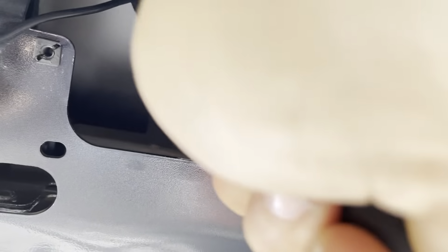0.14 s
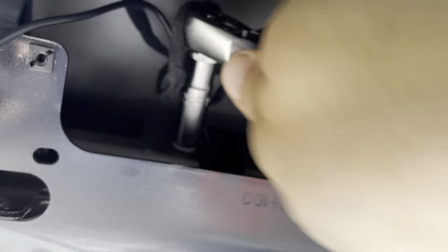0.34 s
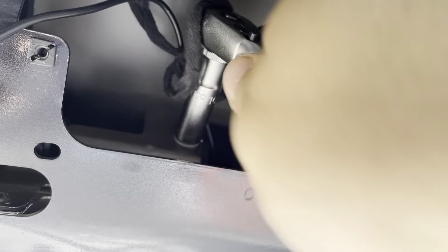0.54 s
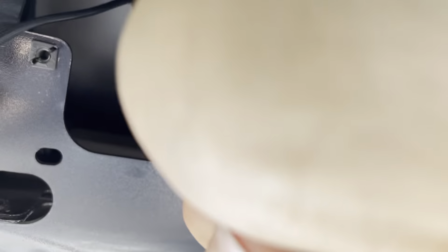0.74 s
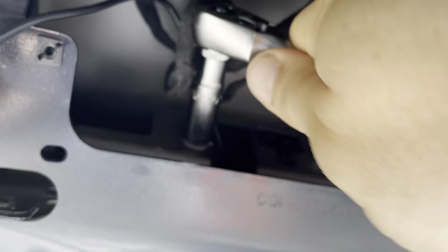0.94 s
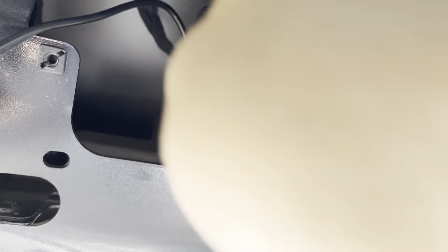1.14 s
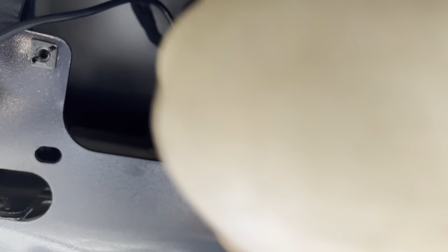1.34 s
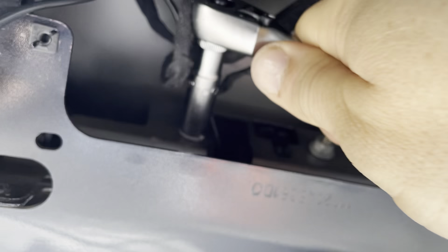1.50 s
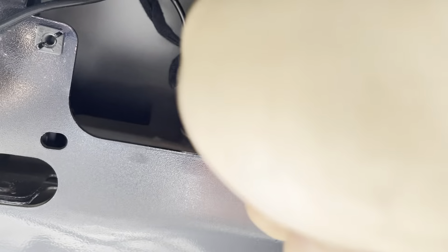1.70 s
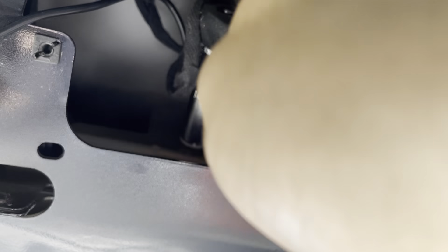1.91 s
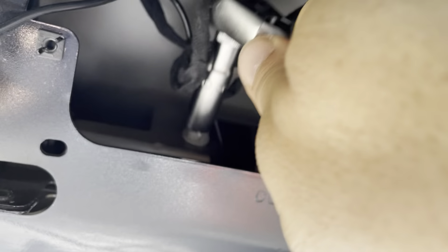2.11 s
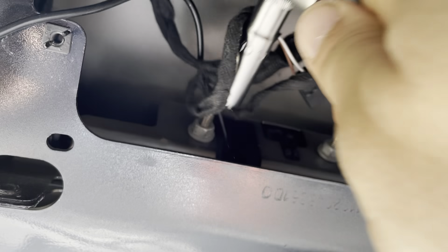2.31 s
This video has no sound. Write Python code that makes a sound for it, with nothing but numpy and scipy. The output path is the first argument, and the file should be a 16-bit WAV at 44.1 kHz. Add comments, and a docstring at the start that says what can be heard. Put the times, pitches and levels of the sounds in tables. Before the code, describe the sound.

A ratchet wrench clicks in short quick runs, with dull hollow knocks from car bodywork between.

```python
"""In a garage, a ratchet wrench works on a nut in a car's bodywork, close to a phone microphone pair.
On each back swing the pawl clicks over the teeth: noise bursts, and decaying modes of the steel shaft.
When the play is taken up the tool knocks, and the hollow panel's modes and filtered noise boom with it.
Random contacts rattle in the loose joints; at the end the socket scrapes and clanks off the nut.
Shaped noise gives the rumble of the handled car, faint air, brief hisses and a thin hum."""
import sys
import numpy as np
from scipy import signal
from scipy.fft import rfft, irfft, next_fast_len
from scipy.io import wavfile
from scipy.ndimage import map_coordinates

SR = 44100
rng = np.random.default_rng(int(sys.argv[2]) if len(sys.argv) > 2 else 0)


def put_to_file(sound):
    """Save the sound as 16-bit audio at rate SR, in the file named by the first command-line argument."""
    columns = np.atleast_2d(sound).T  # one column per channel
    safe = np.clip(columns, -1, 1)
    whole_steps = np.round(safe * 32767)
    wavfile.write(sys.argv[1], SR, whole_steps.astype(np.int16))


def boost(x):
    """Linear amplitude factor 10**(x/20) for a level x in decibels (scalar or array-like)."""
    u = np.asarray(x, float) / 20
    return 10 ** u


N = 103635  # samples

# modes of the steel shaft: f/Hz, relative level/dB, t60/s before any change of damping
SHAFT = [(1793, -8, 0.017), (2074, 0.5, 0.057), (2336, -1, 0.05), (2443, -4.5, 0.068), (2511, -2.5, 0.058),
         (2720, -7, 0.045), (2893, -3, 0.051), (3140, -2.5, 0.063), (3254, -2, 0.039), (3577, -11.5, 0.037),
         (4530, -14, 0.032), (5190, -19.5, 0.037)]
# spectrum of the brightest steel noise: f/Hz, relative density/dB per Hz
TREBLE = [(4710, -56), (8000, -28), (8610, -39), (8740, 5), (9920, 2.5), (11600, -3), (12600, -2.5),
          (14400, -1), (16100, -27), (16700, -64)]
# spectrum of the steel noise below it: f/Hz, relative density/dB per Hz
MIDDLE = [(2240, -8.5), (3800, -5.5), (4240, -1), (4760, -9), (5280, -3), (5810, -14.5), (7160, -2),
          (8200, -0.5), (10700, -43), (18000, -120)]
# spectrum of broad sheet-metal clatter: f/Hz, relative density/dB per Hz
CLATTER = [(400, -49), (600, -27), (800, 6.5), (1200, 11.5), (1700, 12.5), (2500, -38), (4000, -28),
           (5000, -60)]
CONTACT_SPREAD_DB = 4  # uneven strength of small steel contacts


def unit(x):
    """Normalisation to an rms of 1."""
    return x / np.sqrt(np.mean(x ** 2) + 1e-20)


def along(points, hz):
    """Linear interpolation of (f/Hz, value) points on a logarithmic frequency axis."""
    f, v = np.transpose(points)
    return np.interp(np.log(hz + 1), np.log(f + 1), v)


def level(rows):
    """Amplitude modulation: gain per sample, interpolated in dB from (t/s, level/dB) rows."""
    s, db = np.transpose(rows)
    return boost(np.interp(np.arange(N) / SR, s, db))


def wobble(rate):
    """Slow random modulation: a smooth curve through rate random knots a second."""
    knots = rng.standard_normal(int(N * rate / SR) + 4)
    return map_coordinates(knots, [np.arange(N) * rate / SR])


def filtered(x, response):
    """Linear filtering: the spectrum times a complex response of frequency."""
    m = next_fast_len(N + SR // 2)
    return irfft(rfft(x, m) * response(np.fft.rfftfreq(m, 1 / SR)), m)[..., :N]


def coloured(x, spectrum):
    """Spectral shaping of x by (f/Hz, level/dB) points, to an rms of 1."""
    return unit(filtered(x, lambda hz: boost(along(spectrum, hz))))


def noise(spectrum):
    """Subtractive synthesis: white noise given a spectrum, with an rms of 1."""
    return coloured(rng.standard_normal(N), spectrum)


def band(hz, width):
    """Band-pass noise around a frequency, with sloping sides."""
    return noise([(max(hz - width, 20), -45), (hz, 0), (hz + width, -45)])


def envelope(events, t60, rise):
    """Superposed impulse responses: quick rise and exponential fall after each (t/s, level/dB)."""
    t = np.arange(SR // 4) / SR
    starts = [round(s * SR) for s, _ in events]
    spikes = np.bincount(starts, boost([db for _, db in events]), N)[:N]
    return signal.fftconvolve(spikes, boost(-60 * t / t60) * (1 - np.exp(-t / rise)))[:N]


def swells(rows):
    """Growth and decay: a bell-shaped rise to each peak, an exponential fall after it."""
    t = np.arange(N) / SR
    total = 0
    for s, db, swell, t60 in rows:
        loss_db = np.where(t < s, 9 * ((s - t) / swell) ** 2, 60 * (t - s) / t60)
        total = total + boost(db - loss_db)
    return total


def ring(modes, split_hz, tilt_db, rise, free, scatter_db, spread, upper_db=0):
    """Modal synthesis of one blow, peak 1: free scales each decay time, tilt_db favours modes below split_hz."""
    hz, db, t60 = np.transpose(modes)[:, :, None]
    t = np.arange(SR // 4) / SR
    level_chance, phase_chance, pitch_chance = rng.standard_normal((3, len(modes), 1))
    tilt = np.where(hz < split_hz, tilt_db, -tilt_db) / 2
    start_db = db + scatter_db * level_chance + tilt + upper_db * (hz > 600)
    gain = boost(start_db - 60 * t / (t60 * free))
    phase = 2 * np.pi * hz * (1 + spread * pitch_chance) * t + spread * 60 * phase_chance
    wave = np.sum(gain * np.sin(phase), axis=0)
    wave = wave * (1 - np.exp(-(t / rise) ** 2))
    return wave / np.abs(wave).max()


def add(out, s, sound):
    """Superposition: mixes a sound in at time s."""
    out[round(s * SR):][:len(sound)] += sound


def body(f):
    """Resonance: the shaft's modes as a bank of band-pass filters of alternating sign."""
    blur = 7.9  # chatter widens each mode: width/Hz times t60/s
    total = 0
    for k, (centre, db, t60) in enumerate(SHAFT):
        damping = 1j * f * blur / t60
        total = total + (-1) ** k * boost(db) * damping / (centre * centre - f * f + damping)
    return total


def rumble():
    """Low-frequency structure-borne noise of the handled car, partly common to both ports."""
    # t/s, relative level of the deep band/dB, relative level of the upper bass/dB
    strengths = np.array([(0.0, -57, -31.5), (0.06, -60, -39.5), (0.77, -54.5, -35), (0.939, -28.5, -40),
                          (0.96, -45, -67), (1.02, -31.5, -34.5), (1.12, -37.5, -34.5), (1.25, -25, -32.5),
                          (1.33, -37, -57), (1.43, -25.5, -38), (1.5, -22, -34), (1.56, -35.5, -36),
                          (1.74, -40, -46.5), (1.82, -45.5, -45), (1.96, -37.5, -36), (1.991, -49, -63),
                          (2.281, -46, -59), (2.35, -57, -64)])
    # spectrum of the deep band: f/Hz, relative density/dB per Hz
    deep = [(21, -46), (38, -5), (65, -3), (90, -6.5), (120, -28), (200, -120)]
    # spectrum of the upper bass: f/Hz, relative density/dB per Hz
    upper_bass = [(45, -35), (70, 5), (100, 13), (140, 15.5), (200, 8.5), (260, -44)]

    def draw():
        bass = level(strengths[:, ::2]) * boost(-5) * noise(upper_bass)
        return level(strengths[:, :2]) * noise(deep) + bass

    shared = draw()
    return np.array([shared + boost(-6) * draw() for _ in range(2)])


def air():
    """Partly coherent background noise: a shared part that fluctuates and a steadier one for each port."""
    # spectrum of the air noise: f/Hz, relative density/dB per Hz
    spectrum = [(200, -24), (300, 2), (500, -28.5), (900, -51), (1500, -16), (2200, -18), (3400, -14.5),
                (4800, -17), (7400, -22.5), (8000, -25.5), (9700, -30.5), (10500, -22), (15500, -22),
                (16200, -52)]
    # course of the air noise: t/s, relative level/dB
    course = level([(0, -65), (.75, -64.5), (.9, -71), (1.6, -63.5), (2, -68.5), (2.2, -62)])
    shared = course * boost(3.3 * wobble(5.63)) * noise(spectrum)
    return np.array([shared + course * boost(-5) * noise(spectrum) for _ in range(2)])


def loaded_panel():
    """Forced vibration: hand and tool load the panel and keep it booming unevenly."""
    # course of the load: t/s, level/dB before the unevenness
    load = [(0, -52.5), (.185, -57), (.2, -27.5), (.33, -28), (.39, -38.5), (.41, -32.5), (.46, -28),
            (.55, -39.5), (.58, -41.5), (.7, -54.5), (.725, -40.5), (.76, -26.5), (.9, -35.5), (.945, -65),
            (.98, -34), (1.03, -29.5), (1.08, -48), (1.12, -54), (1.22, -55.5), (1.25, -43), (1.31, -24),
            (1.43, -36.5), (1.46, -36.5), (1.48, -21.5), (1.6, -38.5), (1.66, -55), (1.8, -51),
            (1.84, -28.5), (1.88, -35), (1.98, -55.5), (2, -33.5), (2.09, -29), (2.19, -59.5),
            (2.32, -58.5), (2.35, -25.5)]
    # spectrum of the boom: f/Hz, relative density/dB per Hz
    spectrum = [(88, -64), (150, -5), (242, 3), (299, -9), (383, 0), (616, -25), (662, -22), (746, -18),
                (888, -25.5), (1000, -26.5), (1300, -56), (2200, -120)]
    uneven = boost(2.5 * wobble(40.22))
    return level(load) * uneven * noise(spectrum)


def rattles():
    """Random excitation of resonators: small contacts in loose joints ring the shaft, sheet metal and bright ticks."""
    # clusters of contacts: t/s of the peak, relative level/dB, swell/s, t60/s, bright ticks over that level/dB
    clusters = [(0.198, -44, 0.0013, .05, -20), (0.211, -34, 0.0029, 0.085, -23),
                (0.418, -47.5, 0.0047, 0.12, -14), (0.436, -34.5, 0.0078, 0.072, -13.5),
                (0.535, -50, 0.0098, 0.062, -5.5), (0.734, -27, 0.0027, 0.068, -18),
                (0.986, -46, 0.0062, 0.1, -8), (1.005, -39, 0.0096, 0.045, -21),
                (1.255, -46, 0.0064, 0.036, -32), (1.289, -34.5, 0.011, 0.063, -15),
                (1.469, -39, 0.0048, 0.19, -30), (1.495, -38, 0.002, 0.083, -5),
                (1.514, -29, 0.0018, 0.031, -14.5), (1.585, -47.5, 0.0064, 0.11, -28),
                (1.812, -45.5, 0.0064, 0.1, -35), (1.824, -33, 0.005, 0.085, -12.5),
                (1.851, -41, 0.0029, 0.047, -10), (1.923, -56, 0.0045, 0.034, 1),
                (2.006, -47, 0.0033, 0.069, -24), (2.049, -25, 0.013, 0.099, -29),
                (2.084, -30.5, 0.0036, 0.066, -16), (2.113, -53, 0.0044, 0.054, 10.5),
                (2.325, -51, 0.016, .08, -11)]
    contacts_per_s, soft_hz = 1300, 5000

    def grit():
        hits = rng.random(N) < contacts_per_s / SR
        return unit(hits * rng.standard_normal(N) * boost(CONTACT_SPREAD_DB * wobble(150)))

    def soft(hz):  # soft contacts excite the shaft less in the treble
        return body(hz) / (1 + 1j * hz / soft_hz) ** 2

    low = swells([row[:4] for row in clusters])
    high = swells([(s, db + bright_db, swell, t60) for s, db, swell, t60, bright_db in clusters])
    contacts = grit()
    rung = filtered(low * contacts, soft) / np.std(filtered(contacts, soft))
    sheet = boost(-0.5) * low * coloured(grit(), CLATTER)
    ticks = high * (coloured(grit(), MIDDLE) + boost(-5) * coloured(grit(), TREBLE))
    return rung + sheet + ticks


def knocks():
    """Free vibration: soft knocks ring the modes of the hollow steel panel, with a noisy crunch."""
    # t/s, peak level of the ring/dB, low over high modes/dB, change of modes above 600 Hz/dB,
    # rise/s, factor on the modes' t60
    blows = [(0.209, -13, -0.5, 0.5, 0.0061, 0.62), (0.234, -22.5, -23, -1, 0.0027, 1.4),
             (0.26, -20, 3, -14, 0.0014, 1.3), (0.278, -22.5, -5, -5, 0.0022, 0.78),
             (0.302, -16.5, -15, -4.5, 0.0042, 2.5), (0.419, -25, 13, 0, 0.0069, 0.78),
             (0.434, -14, 5, 0.5, 0.0048, 1.03), (0.45, -27, 15, 5, 0.0016, 1.6),
             (0.518, -19.5, 14.5, -9, 0.0035, 2), (0.537, -29, 28, 2, 0.007, 0.32),
             (0.735, -2.5, -3.5, 1.5, 0.0034, 0.98), (0.766, -17, -1, -4, 0.0027, 0.82),
             (0.814, -23.5, -9, -1, 0.002, 0.52), (0.982, -19.5, 19, 2, 0.0038, 1.8),
             (1.007, -13, -2.5, -6.5, 0.0043, 1.6), (1.055, -20, 8, -1, 0.0087, 0.62),
             (1.254, -18, -1, -8.5, 0.0056, 0.47), (1.281, -3, -0.5, -7, 0.0044, 1.11),
             (1.474, -17, 2, -1, 0.0054, 0.76), (1.494, -7.5, 15, -3, 0.0046, 1.1),
             (1.516, -21, -8, 17, 0.0034, 1.1), (1.539, -8, 8, -15, 0.0028, 0.76),
             (1.587, -11.5, 8.5, -15, 0.0043, 0.64), (1.81, -18, 28, 0, 0.0037, 1.4),
             (1.82, -4, -8.5, 0.5, 0.0025, 0.9), (1.853, -15, 3.5, -1.5, 0.0012, 0.98),
             (1.921, -28, 3, -6, 0.004, 1), (1.993, -20.5, 5.5, -1.5, 0.0012, 0.85),
             (2.071, -19, -3.5, 3, 0.00087, 0.43), (2.333, -32, -13, -1, 0.0065, 0.81)]
    # modes of the panel: f/Hz, relative level/dB, t60/s before that factor
    modes = [(141.7, -10, 0.16), (206.7, -7.5, 0.07), (234.7, -2, 0.1), (379.1, -0.5, 0.079),
             (400.8, -1.5, 0.058), (512.6, -17, 0.083), (723, -13.5, 0.052), (758, -8.5, 0.045),
             (1009, -17, 0.051), (1102, -23.5, 0.053)]
    out = np.zeros(N + SR)
    for s, db, tilt_db, upper_db, rise, free in blows:
        blow = ring(modes, 300, tilt_db, rise, free, scatter_db=1.5, spread=0.006, upper_db=upper_db)
        add(out, s, boost(db) * blow)
    crunches = [(s, db - 27 - tilt_db / 2) for s, db, tilt_db, *_ in blows]
    return out[:N] + envelope(crunches, t60=0.1, rise=0.00066) * noise(CLATTER)


def wrench():
    """Impact excitation: pawl snaps are noise bursts; each contact rings the shaft, with spring and tooth chatter."""
    # pawl clicks and small steel ticks: t/s, reference level/dB,
    # middle burst relative to it/dB and shaft ring relative to it/dB, each before an offset
    clicks = [(0.2554, -8.5, 2.5, -4.5), (0.27, -8.5, 7, -6), (0.285, -7, 3, -6.5), (0.3013, -6.5, 1, -8.5),
              (0.3214, -18.5, 7, -4), (0.3568, -20, 10.5, 4.5), (0.4085, -42, 7, -24),
              (0.4329, -33.5, 0, -5), (0.4508, -41, -1, -25), (0.795, -18, 11, -2), (0.8123, -15, -1, 7.5),
              (0.832, -19.5, 15.5, 7.5), (0.8576, -14, -5, 2), (0.8882, -21, 5.5, 8), (0.9867, -44, 6, 2),
              (1, -43, 12, 9), (1.0373, -37, 17, 4.5), (1.3333, -14.5, 10, -8.5), (1.346, -19, 9.5, 2),
              (1.361, -20, 8, 4), (1.3786, -17, -8, 5), (1.4031, -19, 12, 1), (1.4335, -18.5, 5, 1.5),
              (1.739, -38.5, 12.5, -20), (1.906, -43, -7, -5), (1.954, -36, -7, -16),
              (1.9885, -24, 10.5, -3), (2.0665, -20, 0, -8)]
    # steel on steel without the pawl: t/s, reference level/dB, middle burst over it/dB, low over high modes/dB
    clanks = [(0.5494, -49.5, -9, -15), (0.7353, -25, -11, 2), (1.4666, -40, -26, 5),
              (1.5848, -42, -15, -1), (1.8194, -15.5, -24, -2), (2.0669, -4, -11.5, -10.5),
              (2.0703, -11.5, -11, 0.5), (2.0815, -17, -10, -7), (2.3303, -29, -19, -29),
              (2.3378, -41, -13, 11)]
    snap_rise, shaft_rise = 0.00021, 0.00026  # s
    top = envelope([(s, db - 8.5) for s, db, _, _ in clicks], 0.028, snap_rise) * noise(TREBLE)
    bursts = [(s, db + rel - 17) for s, db, rel, _ in clicks]
    bursts += [(s, db + rel) for s, db, rel, _ in clanks]
    middle = envelope(bursts, 0.029, snap_rise) * noise(MIDDLE)

    # t/s, level/dB, clear ring relative to it/dB, low over high modes/dB
    blows = [(s, db + rel - 5.5, -4, 0) for s, db, _, rel in clicks]
    blows += [(s, db - 6, 0, tilt_db) for s, db, _, tilt_db in clanks]
    shaft = np.zeros(N + SR)
    for s, db, clear_db, tilt_db in blows:
        blow = ring(SHAFT, 3050, tilt_db, shaft_rise, free=0.68, scatter_db=4.5, spread=0.013)
        add(shaft, s, boost(db + clear_db) * blow)

    shake = envelope([blow[:2] for blow in blows], 0.042, shaft_rise)
    rough = rng.standard_normal(N) * boost(CONTACT_SPREAD_DB * wobble(300))
    chatter = filtered(shake * rough, body) / np.std(filtered(rough, body)) / 2
    sheet = boost(-19) * shake * noise(CLATTER)
    steel = middle + shaft[:N] + chatter + sheet
    # a near wall returns the steel once, 12.4 ms later
    echo = boost(-13.5) * np.pad(steel, (round(0.0124 * SR), 0))[:N]
    return top + steel + echo


def hisses():
    """Band-limited noise: faint hisses that rise and fall under a rounded window."""
    # start t/s, length/s, centre f/Hz, half-width/Hz, level/dB
    rows = [(.57, 0.059, 4450, 1200, -62.5), (1.05, 0.047, 6100, 704, -58.5),
            (1.057, 0.18, 5050, 900, -68.5), (1.586, 0.082, 5000, 700, -62), (2.002, 1, 3130, 3500, -60.5),
            (2.1, 0.41, 1040, 515, -61.5), (2.2, 0.2, 12700, 6040, -67.5)]
    t, total = np.arange(N) / SR, 0
    for s, length, hz, width, db in rows:
        window = np.sin(np.pi * np.clip((t - s) / length, 0, 1)) ** 0.5
        total = total + boost(db) * window * band(hz, width)
    return total


def hum():
    """Narrow-band noise: a thin fluctuating hum sets in, drawn anew for each port."""
    # t/s, level/dB before the fluctuation
    course = level([(0, -81), (.88, -100), (.94, -60), (2.35, -61)])
    return np.array([course * boost(2.2 * wobble(12.27)) * band(1200, 205) for _ in range(2)])


def cavity(x):
    """Reverberation: each frequency of the surrounding bodywork's answer dies at its own speed."""
    # decay of the bodywork's answer: f/Hz, t60/s
    decay = [(200, 0.13), (2000, 0.11), (12000, 0.01)]
    hz, t, z = signal.stft(rng.standard_normal((2, SR // 4)), SR, nperseg=256)
    fading = z * boost(-60 * t / along(decay, hz)[:, None])
    tail = signal.istft(fading, SR, nperseg=256)[1]
    return signal.fftconvolve(x[None], tail / np.linalg.norm(tail[0]), axes=1)[:, :N]


def two_ports(x):
    """Interchannel phase and level difference: each port hears the work in its own way."""
    # phase by which left leads right: f/Hz, phase/rad
    lead = [(0, 0), (200, .55), (400, .5), (520, .8), (800, 1.6), (1400, 2), (1640, 3.6), (1890, 5.2),
            (2240, 5.6), (3100, 7.4), (4220, 6.5), (5170, 7.6), (5600, 5.3), (6550, 5), (7410, 3.6),
            (9560, 2.8), (11500, .5), (16400, .3)]
    # left over right: f/Hz, level difference/dB
    pan = [(30, .4), (85, .2), (170, 1), (240, 2.5), (420, 2.5), (700, 7), (1400, 2.6), (5600, 2.6),
           (10000, 0), (16000, .1)]
    side = np.array([[.5], [-.5]])
    return filtered(x, lambda hz: boost(side * along(pan, hz)) * np.exp(1j * side * along(lead, hz)))


def scene():
    """Superposition of the direct work, the bodywork's reverberation and the background."""
    background = rumble() + air()
    work = loaded_panel() + rattles() + knocks() + wrench()
    background = background + hisses() + hum()
    return two_ports(work) + boost(-12) * cavity(work) + background


def low_pass(x):
    """Removes everything above the highest recorded frequency."""
    return signal.sosfilt(signal.butter(12, 16810, fs=SR, output="sos"), x)


def record(dry):
    """Band limitation: the phone's microphones lose the deepest bass and the top treble."""
    low_cut_hz, top_hz = 45, 16200

    def microphone(hz):
        high_pass = (1j * hz / (low_cut_hz + 1j * hz)) ** 2
        return high_pass / np.sqrt(1 + (hz / top_hz) ** 60)

    mix = filtered(dry, microphone)
    return low_pass(mix)


dry = scene()
out = record(dry)
put_to_file(out)
```